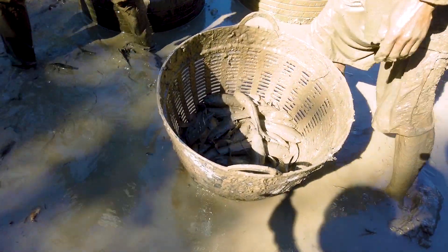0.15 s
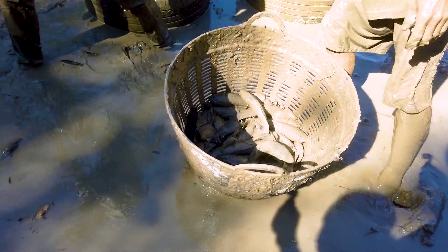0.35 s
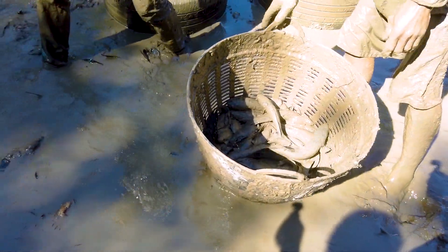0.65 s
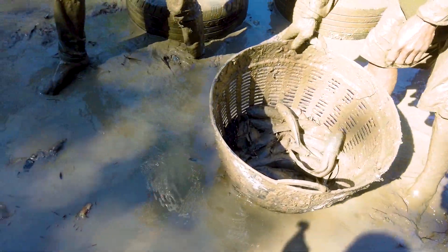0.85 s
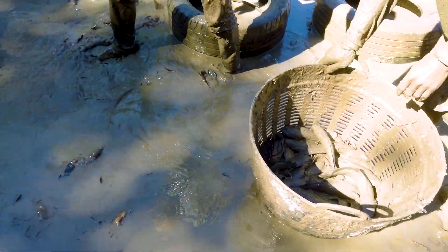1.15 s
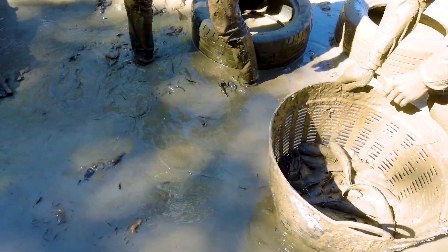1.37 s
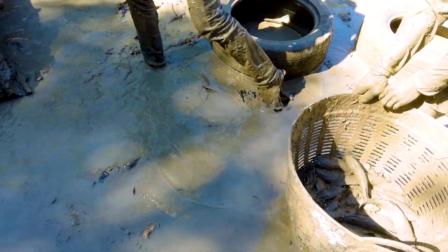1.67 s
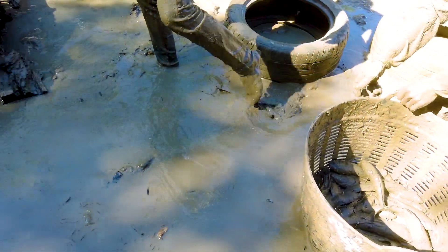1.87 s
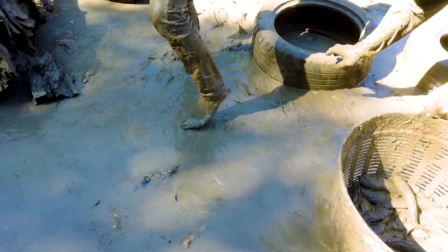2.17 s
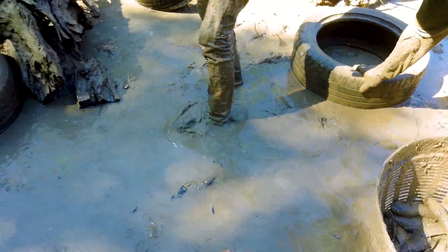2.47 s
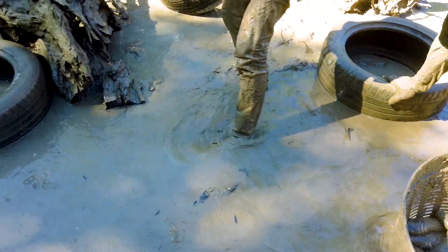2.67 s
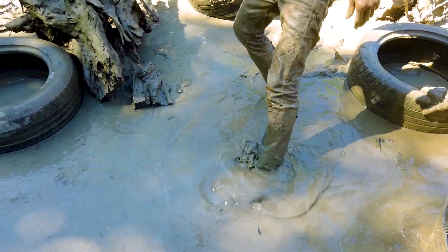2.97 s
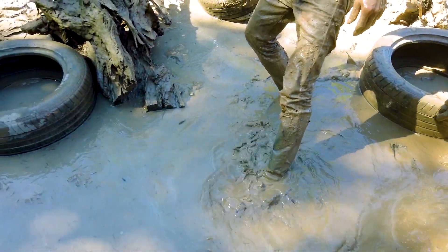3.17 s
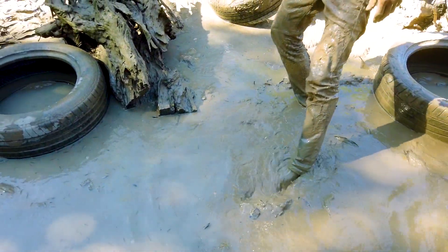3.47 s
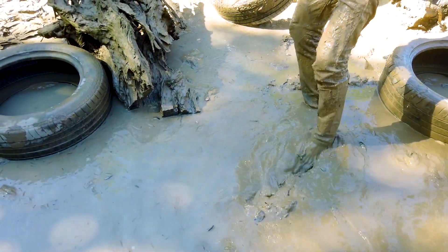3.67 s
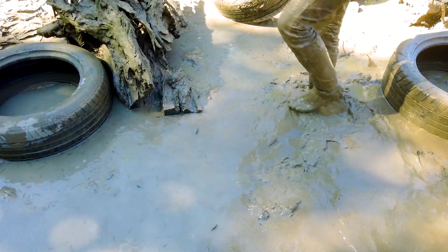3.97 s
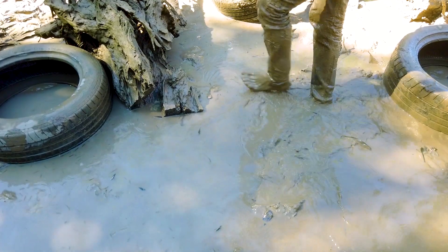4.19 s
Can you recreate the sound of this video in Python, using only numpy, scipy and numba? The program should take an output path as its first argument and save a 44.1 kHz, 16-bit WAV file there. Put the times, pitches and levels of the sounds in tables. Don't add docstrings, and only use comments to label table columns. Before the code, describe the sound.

Bare feet squelch and slosh through shallow muddy water, with popping bubbles, wet smacks and a gusty breeze thumping the microphone.

```python
import sys
import numpy as np
from scipy import signal
from scipy.fft import rfft, irfft, next_fast_len
from scipy.io import wavfile
from scipy.ndimage import uniform_filter1d
from numba import njit

SR = 44100
rng = np.random.default_rng(int(sys.argv[2]) if len(sys.argv) > 2 else 0)


def nominal_scale(level):
    x = np.asarray(level, float) / 20
    return 10 ** x


def file_out(sig):
    cols = np.atleast_2d(sig).T
    lim = np.clip(cols, -1, 1)
    pcm = np.round(lim * 32767).astype(np.int16)
    wavfile.write(sys.argv[1], SR, pcm)


N = 190953


def level(x):
    return x / np.sqrt(np.mean(x ** 2))


def colour(x, points):
    hz, db = np.transpose(points)
    size = next_fast_len(N)
    log_hz = np.log(np.arange(size // 2 + 1) * SR / size + 1)
    gain = nominal_scale(np.interp(log_hz, np.log(hz), db))
    return irfft(rfft(x, size) * gain, size)[..., :N]


def band(x, low_hz, high_hz, order=2):
    limits = [low_hz, min(high_hz, .45 * SR)]
    return signal.sosfilt(signal.butter(order, limits, "bandpass", fs=SR, output="sos"), x)


def walk(rate, channels=1):
    k = int(SR / rate)
    held = np.repeat(rng.standard_normal((channels, N // 200)), k, axis=1)[:, :N]
    return level(uniform_filter1d(uniform_filter1d(held, k), k))


def swells(s, db, half_s, floor_db):
    away = (np.arange(N)[:, None] / SR - s) / np.clip(half_s, .015, .3)
    bells = nominal_scale(db - 6 * np.minimum(away ** 2, 20))
    return 10 * np.log10(nominal_scale(floor_db) ** 2 + np.sum(bells ** 2, axis=1))


def bursts(s, db, ms, rise_ms):
    env = np.zeros(N)
    for at, size, t60 in zip((s * SR).astype(int), nominal_scale(db), ms / 1000):
        t = np.arange(min(int(t60 * SR), N - at)) / SR
        env[at:at + len(t)] += size * 1000. ** (-t / t60) * np.minimum(t * 1000 / rise_ms, 1)
    return env


def hiss(low_hz, high_hz, apart):
    noise = rng.standard_normal((3, N))
    return level(band(noise[0] + apart * noise[1:], low_hz, high_hz))


@njit
def ring(s, hz, t60, glide, size, rise, lag):
    out = np.zeros((2, N))
    for e in range(len(s)):
        n = int(t60[e] * SR)
        fall = np.exp(-np.log(1000.) / n)
        for c in range(2):
            at = s[e] * SR + (1 - c) * lag[e]
            first = int(at) + 1
            step = 2 * np.pi * hz[e] / SR
            phase = step * (first - at)
            strength = size[e]
            for i in range(max(0, min(n, N - first))):
                if first + i >= 0:
                    onset = min(1., (i + 1) / (rise[e] * SR + 1))
                    out[c, first + i] += strength * onset * np.sin(phase)
                phase += min(step * (1 + glide[e] * i / n), 2.8)
                strength *= fall
    return out


def swarm(low_hz, high_hz, cycles, scatter_db, spread, noise, apart, count, glide=1):
    when, pitch, strength, length, bend = rng.random((count, 5)).T
    side = rng.standard_normal(count)
    hz = low_hz * (high_hz / low_hz) ** pitch
    size = nominal_scale(np.minimum(-scatter_db * np.log(strength + 1e-4), 4 * scatter_db))
    t60 = cycles * (1.0 + 2.37 * length) / hz
    grains = ring(when * N / SR, hz, t60, glide * (0.855 * bend - .15), size, 0.041 * t60, spread * side)
    return level(level(grains) + noise * hiss(low_hz, high_hz, apart))


def ragged(x, depth=0.23, hz=350):
    wobble = level(band(rng.standard_normal(N), 130, hz, order=1))
    return x * (1 + depth * wobble) / np.sqrt(1 + depth ** 2)


def air():
    # f/Hz, level/dB per Hz
    air_tone = [(120, -10), (200, 18.5), (2170, -21), (4410, -44), (10800, -36), (15500, -10)]
    near = level(colour(hiss(80, 2700, 0.12), air_tone)) * nominal_scale(-75.5)
    far = level(colour(hiss(2000, 21000, 3.3), air_tone)) * nominal_scale(-75.5 - 35)
    return near + far


def breeze():
    # middle t/s, thump level/dB, half length/s, flutter over the thump/dB
    gusts = [(0.022, -46.5, 0.073, -2), (0.13, -40.5, 0.041, -18), (0.212, -47.5, 0.05, -26),
             (0.409, -36.5, 0.031, -4), (0.518, -53, 0.051, -12), (0.682, -44, 0.05, -21),
             (0.77, -48.5, 0.025, 1.5), (1.013, -35, 0.034, -4.5), (1.113, -32.5, 0.055, -5),
             (1.223, -43, 0.1, -15), (1.375, -44.5, 0.073, -28), (1.526, -34.5, 0.018, -1.5),
             (1.61, -46, 0.048, -20), (1.787, -37.5, 0.019, -16), (1.873, -41.5, 0.038, -25),
             (2.024, -45.5, 0.053, -11), (2.685, -46, 0.035, -29), (2.87, -34.5, 0.03, 0),
             (2.983, -35.5, 0.076, -22), (3.115, -29.5, 0.037, -8), (3.261, -36, 0.058, -19),
             (3.391, -29.5, 0.029, -18), (3.564, -34, 0.17, -18), (3.707, -43.5, 0.094, -9),
             (3.826, -41.5, 0.052, -24), (3.984, -45, 0.045, -31)]
    s, db, half_s, flutter_over = np.transpose(gusts)
    thump_db = swells(s, db, half_s, -57)
    flutter_db = swells(s, db + flutter_over, half_s, -72)
    noise = rng.standard_normal((2, 3, N))
    noise = noise[:, 1:] + 0.65 * noise[:, :1]
    slow = band(band(noise[0], 22, 70, order=1), 12, 84, order=3)
    thump = level(slow) * nominal_scale(thump_db - 1.2 + 1.53 * walk(23.85))
    flutter = level(band(noise[1], 80, 145, order=4)) * nominal_scale(flutter_db - 6 + 3 * walk(25))
    return thump + flutter


def bird():
    # t/s, level/dB, f/Hz, fade/ms
    hoots = [
        (0.85, -40, 425, 38),
        (1.024, -44.5, 416, 28),
        (2.997, -43, 425, 40),
        (3.193, -42.5, 438, 24),
    ]
    out, t = np.zeros(N), np.arange(N) / SR
    for s, db, hz, ms in hoots:
        age = np.clip(t - s, 0, None)
        shape = np.clip(age / 0.0074, 0, 1) * np.exp(-(age * 1000 / ms) ** 2)
        out += nominal_scale(db) * shape * np.sin(2 * np.pi * hz * age)
    return out


def sheets():
    # middle t/s, level/dB, half length/s
    films = [
        (1.103, -58, 0.066),
        (1.66, -59.5, 0.079),
        (4.187, -62.5, 0.017),
    ]
    fizz = swarm(7900, 8970, cycles=220, scatter_db=2, spread=0.92, noise=1.0, apart=0.59, count=2000, glide=0.047)
    return fizz * nominal_scale(swells(*np.transpose(films), -107))


def slosh():
    # middle t/s, slosh level/dB, half length/s, gurgle over slosh/dB, spray over slosh/dB
    pushes = [(.02, -53.5, 0.1, 1.5, 0), (.14, -53, 0.046, -15, 3), (.25, -57, 0.047, -13, -0.5),
              (0.551, -58.5, 0.098, -19, -39), (0.802, -78.5, 0.075, 18.5, 13),
              (1.081, -66.5, 0.058, 2, 14.5), (1.181, -50, 0.068, -2.5, 3), (1.36, -54, 0.18, -10, 2),
              (1.602, -52, 0.044, -28, 0.5), (1.754, -55, 0.082, 6.5, 7), (1.9, -50, 0.13, -34, -2.5),
              (2.052, -54.5, 0.079, -2.5, -2.5), (2.24, -60, 0.096, -5, -5), (2.452, -56.5, 0.093, -9, -11),
              (2.621, -55.5, 0.11, -7, -2.5), (2.871, -52.5, 0.067, -4.5, -0.5),
              (3.104, -51, 0.11, -8.5, -12.5), (3.304, -55.5, 0.12, -12.5, 3),
              (3.564, -55, 0.052, -16, -3.5), (3.842, -54.5, 0.091, -27, -5),
              (3.934, -42.5, 0.074, -39, -7), (4.041, -51.5, 0.077, -5, 0.5), (4.22, -56.5, 0.13, -22, -1)]
    still_db = [
        -69,
        -71,
        -65.5,
    ]
    s, db, half_s, gurgle, spray = np.transpose(pushes)
    slosh_db = swells(s, db, half_s, still_db[0])
    gurgle_db = swells(s, db + gurgle, half_s, still_db[1])
    spray_db = swells(s, db + spray, half_s, still_db[2])
    middle = swarm(837.2, 3500, cycles=20, scatter_db=1.5, spread=0.96, noise=0.5, apart=0.56, count=2600)
    large = swarm(259.4, 950, cycles=19.6, scatter_db=1.0, spread=0.65, noise=0.86, apart=0.026, count=500)
    flicker_db = 3 * walk(55, channels=2)
    patches_db = 1.8 * walk(12, channels=3)
    fine = 0
    for hz, patch_db in zip([3700, 5700, 9300], patches_db):
        drops = swarm(hz, 1.65 * hz, cycles=220, scatter_db=2, spread=1.75, noise=1.1, apart=1.3,
                      count=2600, glide=.04)
        fine = fine + nominal_scale(patch_db) * drops
    middle = ragged(middle) * nominal_scale(slosh_db - 1.5 + flicker_db[0])
    large = large * nominal_scale(gurgle_db + 4.0 + flicker_db[1])
    return middle + large + fine * nominal_scale(spray_db - 1.0)


def spits():
    # t/s, peak level/dB, f/Hz, length/ms
    droplets = [(0.0208, -28, 5100, 3.6), (0.041, -40.5, 5320, 9), (0.1153, -44.5, 5380, 22),
                (0.766, -55.5, 12000, 47), (1.1435, -21, 7100, 5.3), (1.1629, -36, 5220, 35),
                (1.193, -43, 9600, 24), (1.3413, -45.5, 5300, 54), (1.449, -45.5, 5700, 19),
                (1.789, -29.5, 8270, 6.6), (1.8176, -48, 10430, 88), (2.219, -46, 4430, 32),
                (2.4233, -52, 6960, 85), (2.742, -51, 5680, 8.9), (2.54, -46.5, 5740, 12.7),
                (2.605, -35.5, 8700, 11.4), (2.85, -48, 5700, 100), (2.9724, -32, 8100, 9.7),
                (2.976, -29.5, 7080, 7.1), (3.281, -48, 11500, 91), (3.3034, -22.5, 4070, 6.1),
                (3.351, -35.5, 5140, 6.4), (3.544, -53.5, 10700, 24), (3.719, -39, 10060, 7.8),
                (3.784, -48.5, 9600, 40), (3.924, -34.5, 10000, 16), (4.25, -53, 5240, 71)]
    s, db, hz, ms = np.transpose(droplets)
    ms = np.clip(ms, 2, 80)
    out = ring(s, hz, np.minimum(ms, 13) / 1000, 0 * s + 0.12, nominal_scale(db + 16.5), 0 * s + 0.0017, 0 * s)
    # t/s, peak level/dB, f/Hz
    ticks = [(0.124, -36, 11370), (1.143, -31, 5750), (1.1425, -38, 10100), (1.1918, -39, 4500),
             (1.191, -28, 7660), (1.194, -33.5, 10800), (1.341, -31, 8670), (1.351, -28, 5020),
             (1.358, -38, 10740), (1.693, -35.5, 5570), (1.789, -22.5, 6740), (1.7889, -22, 8380),
             (1.8187, -36, 11560), (2.4159, -36, 12170), (2.4233, -28, 4020), (2.4326, -36.5, 7540),
             (2.608, -26, 9570), (2.6082, -31, 10400), (2.868, -35, 6450), (2.9716, -32, 5770),
             (2.9732, -39, 12500), (2.9756, -23.5, 7600), (3.2823, -43, 10500), (3.3062, -38, 10720),
             (3.3062, -28, 12000), (3.307, -32, 11300), (3.3287, -36, 10600), (3.7975, -34, 9800),
             (3.858, -36, 11600), (3.896, -32, 4500), (3.9074, -34, 10600), (3.9266, -31, 11500),
             (3.9274, -38, 12660), (3.927, -33, 8140), (3.9274, -31, 9300), (4.2453, -35.5, 5170)]
    at, tick_db, tick_hz = np.transpose(ticks)
    tick_s = 0 * at + 0.0107
    out = out + ring(at, 1. * tick_hz, tick_s, 0 * at + 0.021, nominal_scale(tick_db + 11.5), 0 * at + 0.0031, 0 * at)
    for low_hz, high_hz in [(3800, 5800), (6200, 10600), (8800, 14900)]:
        spray = swarm(low_hz, high_hz, cycles=10, scatter_db=4, spread=0.5, noise=0.6, apart=0.9, count=5000)
        off_db = -18 * np.abs(np.log2(hz / np.sqrt(low_hz * high_hz)))
        out = out + bursts(s - .005, db + 9.5 + off_db, 3.6 * ms, rise_ms=9.5) * spray
    return out


def splashes():
    # t/s, peak level/dB
    cracks = [(0.0014, -23.5), (0.122, -25.5), (0.202, -40), (0.234, -33), (0.536, -30.5), (0.578, -33),
              (0.8212, -34), (0.881, -35), (1.055, -28), (1.138, -19), (1.1796, -20), (1.195, -45),
              (1.3385, -24.5), (1.462, -25), (1.828, -16.5), (2.19, -29), (2.413, -24.5), (2.582, -29),
              (3.067, -24.5), (3.39, -32.5), (3.723, -33.5), (3.792, -23.5), (3.8405, -27), (3.924, -14),
              (3.967, -30)]
    s, db = np.transpose(cracks)
    froth = swarm(640, 5000, cycles=12, scatter_db=2.5, spread=1.0, noise=1.0, apart=0.37, count=6000)
    return bursts(s, db - 17.0, 0 * s + 79, rise_ms=0.45) * froth


def glugs():
    # t/s, peak level/dB, f/Hz, ring/ms
    big_pockets = [(0.004, -50.5, 315, 47), (0.122, -36.5, 305, 5.5), (0.247, -63.5, 297, 65),
                   (0.396, -51, 188, 210), (0.709, -56, 273, 83), (0.775, -48, 280, 40),
                   (1.067, -42.5, 255, 33), (1.13, -54, 237, 67), (1.239, -50, 333, 67),
                   (1.55, -61.5, 170, 100), (2.099, -47, 605, 5.1), (2.388, -61.5, 245, 62),
                   (2.865, -51.5, 199, 51), (3.145, -50.5, 165, 44), (3.39, -59.5, 193, 71),
                   (3.468, -59.5, 180, 97), (3.588, -68, 232, 130)]
    s, db, hz, ms = np.transpose(big_pockets)
    return ring(s, hz, np.clip(ms, 3, 200) / 1000, 0 * s + 0.29, nominal_scale(db + 22.0), 0.47 / hz, 0 * s)


def smacks():
    # t/s, peak level/dB, f/Hz, length/ms
    rising = [(0.1227, -41, 1987, 17.4), (1.14, -31.5, 930, 10), (1.1433, -29.5, 410, 31),
              (1.32, -43, 1050, 23), (1.4632, -16.5, 466, 2.9), (1.9141, -37.5, 1785, 5.6),
              (3.805, -40.5, 554, 46), (2.187, -50, 2283, 42), (2.3923, -43, 1260, 27),
              (2.418, -40, 1583, 15), (2.4217, -33, 3310, 16), (2.544, -42.5, 2450, 12.5),
              (2.655, -40.5, 1133, 13), (2.851, -29.5, 1090, 16), (2.8862, -40.5, 2040, 1.7),
              (2.97, -38, 1230, 6.5), (0.794, -40.5, 525, 46), (3.166, -31.5, 1170, 12),
              (3.2178, -34.5, 1168, 20), (3.2913, -33, 2630, 1.9), (3.3001, -31.5, 436, 13),
              (3.306, -34, 3270, 14), (4.186, -38, 804, 49), (3.7188, -33, 1547, 9.1),
              (3.935, -30.5, 1147, 12), (3.968, -34.5, 1147, 19), (4.017, -35.5, 1075, 34),
              (4.0692, -32, 401, 33.6), (4.182, -37, 2820, 4.5), (4.1895, -34.5, 1090, 31)]
    sucking = [(0.4482, -42.5, 1170, 9.1), (0.7291, -40.5, 1794, 10), (1.0687, -40, 2280, 10.5),
               (1.151, -32, 1780, 4.7), (1.1909, -29, 2990, 9.1), (1.341, -43, 2220, 5.9),
               (1.3592, -34.5, 2020, 3.3), (1.4511, -31, 1040, 2.2), (1.4637, -32.5, 2620, 0.79),
               (1.6876, -27.5, 1093, 10), (1.7148, -25, 583, 15), (1.7175, -20.5, 1026, 0.86),
               (1.829, -33, 1654, 10), (2.2273, -41, 1240, 13.5), (2.5848, -37, 1135, 9),
               (2.8101, -36, 1005, 8.2), (2.8515, -23, 693, 19.7), (3.0662, -33.5, 1207, 12.6),
               (3.077, -31.5, 990, 13.5), (3.664, -37.5, 715, 30), (3.785, -39, 900, 15),
               (3.839, -31, 890, 10.7), (3.895, -32.5, 920, 25)]
    steady = [(0.0434, -37.5, 1770, 7.3), (0.049, -42.5, 2860, 14), (0.43, -35.5, 1247, 10.4),
              (0.474, -38.5, 1230, 5.8), (1.1808, -29, 2060, 5.5), (1.192, -30.5, 1635, 3.4),
              (1.338, -39.5, 3077, 30), (1.627, -43.5, 2710, 8.9), (1.6477, -26.5, 697, 5.4),
              (1.7108, -46, 1730, 43), (1.817, -43.5, 2090, 8), (1.82, -25.5, 1290, 2.5),
              (1.8225, -25, 810, 5.8), (1.878, -28.5, 1260, 0.99), (2.14, -43, 1680, 4.4),
              (3.456, -42, 1200, 15), (2.43, -40, 2730, 12), (2.6083, -34, 965, 9.3),
              (2.6328, -43.5, 1685, 9.6), (2.866, -43, 1520, 24), (3.0298, -39.5, 3025, 8.9),
              (3.128, -33.5, 2266, 8.4), (3.308, -38.5, 1685, 10), (3.31, -39.5, 2273, 20),
              (3.7935, -42.5, 2370, 6.5), (3.876, -36, 2923, 15), (3.9286, -27, 2140, 6.6),
              (3.9927, -35.5, 1043, 28)]
    # t/s, peak level/dB, f/Hz, length/ms
    blips = [(0.1235, -43.5, 1690, 18), (0.124, -44, 1010, 9.1), (0.4604, -45.5, 1570, 7.4),
             (0.823, -51, 2090, 11.0), (0.8854, -51, 2480, 5.5), (1.057, -45.5, 2720, 8.0),
             (1.0893, -44.5, 2880, 19), (1.164, -39.5, 2600, 5.3), (1.1657, -32, 1550, 6.4),
             (1.1797, -40, 1700, 7.1), (1.1931, -34.5, 2050, 7.0), (1.2199, -36, 1710, 8.0),
             (1.3425, -40, 1230, 5.9), (1.3435, -50, 2940, 4.4), (1.3503, -39, 1560, 3.7),
             (1.36, -39, 2210, 7.0), (1.4653, -40, 1200, 7.0), (1.7418, -38.5, 1720, 5.6),
             (1.8287, -42, 2000, 6.0), (1.8302, -42, 2800, 8), (1.9888, -41, 1490, 8.5),
             (2.0479, -45.5, 2055, 12.0), (2.2899, -44, 2700, 4.3), (2.3062, -48, 1980, 6.2),
             (2.4143, -48, 2114, 17), (2.5091, -40.5, 1050, 7.4), (2.5828, -45, 2820, 12),
             (2.8515, -47, 2960, 8.0), (2.9723, -43, 1750, 5.7), (3.1218, -40.5, 1680, 15),
             (3.3083, -38, 2880, 6), (3.323, -41.5, 2740, 8.8), (3.7982, -42, 1640, 13.0),
             (3.8394, -38.5, 2070, 13), (3.8445, -37.5, 2450, 5.1), (3.8554, -40, 2100, 9.2),
             (3.858, -46, 2875, 36), (3.8975, -39, 1850, 8.7), (3.9279, -39, 2680, 5.7),
             (3.97, -34, 1720, 8.9), (3.9737, -40, 2050, 12), (4.0883, -42.5, 1770, 12),
             (4.2284, -40, 1210, 6.5),
             (0.3356, -52, 763, 24), (0.5489, -56.5, 604, 16), (0.592, -46, 1590, 3.6),
             (0.8005, -51, 530, 19), (0.8866, -47.5, 2140, 3.0), (1.1417, -28, 690, 3.7),
             (1.3275, -43.5, 950, 31), (1.399, -52, 2350, 7.0), (1.574, -44, 1140, 7.3),
             (1.714, -35, 1270, 3.2), (1.829, -37, 2730, 3), (2.009, -41, 1890, 3.3),
             (2.0625, -42, 534, 17.0), (2.39, -43, 840, 5), (2.7144, -49, 1670, 14),
             (3.039, -45, 1378, 8.8), (3.0828, -53, 710, 4.0), (3.1394, -36.5, 870, 23),
             (3.2357, -41, 1000, 21), (3.284, -43.5, 1990, 16), (3.5051, -49, 520, 16),
             (3.521, -42.5, 1540, 2.7), (3.673, -53.5, 2150, 4), (3.808, -39, 845, 6.9),
             (4.092, -50, 2560, 6.4), (4.107, -41, 1210, 3.0), (4.2741, -45.5, 1730, 8.7),
             (4.2946, -46, 865, 3.7)]
    # t/s, peak level/dB, f/Hz
    more_blips = [(0.006, -51, 1700), (0.054, -45, 1210), (0.197, -51, 2560), (1.141, -47, 3030),
                  (1.38, -51, 2260), (1.442, -45, 1620), (1.665, -36, 724), (1.756, -54, 2340),
                  (1.772, -41, 1360), (1.975, -53, 2500), (2.112, -43.5, 690), (2.608, -47, 1607),
                  (2.63, -48, 2770), (3.232, -54, 2170), (3.348, -48, 2583), (3.6, -48, 2260),
                  (3.862, -38, 1220), (3.867, -38.5, 1710), (3.902, -43, 2340), (3.904, -40, 1390),
                  (4.049, -52, 2900), (4.255, -40, 1180)]
    swoops = [
        (0.573, -52, 870, 21),
        (3.15, -38, 532, 45),
        (3.431, -53, 1004, 30),
        (3.55, -47, 785, 20),
    ]
    more_ms = 10.5
    small = blips + [extra + (more_ms,) for extra in more_blips]
    s, db, hz, ms = np.transpose(rising + sucking + steady + small + swoops)
    glide = np.repeat([0.49, -0.396, 0.016, 0.15, 1.9],
                      [len(rising), len(sucking), len(steady), len(small), len(swoops)])
    t60 = (9 + 2.08 * np.clip(ms, 1, 150)) / 1000
    return ragged(ring(s - .0012, hz, t60, glide, nominal_scale(db + 6.0), 0.12 * t60, 0 * s))


def banks(x, t60=0.17, db=-12):
    t = np.arange(8000) / SR
    tail = rng.standard_normal((2, 8000)) * 1000. ** (-t / t60) * (t > .002)
    tail = tail / np.sqrt(np.sum(tail[0] ** 2))
    return x + nominal_scale(db) * signal.fftconvolve(x, tail, axes=1)[:, :N]


def ports(x):
    # f/Hz, phase/rad
    lead = [(0, 0), (300, -.42), (2500, -.5), (2900, -1), (3300, -3.3), (4100, -3.6), (6100, -6.1),
            (8500, -6.6), (10000, -8), (11500, -7.1), (16000, -7.4)]
    size = next_fast_len(N)
    left, right = rfft(x, size)
    turn = np.interp(np.arange(len(left)) * SR / size, *np.transpose(lead))
    return irfft(np.array([left * np.exp(1j * turn), right]), size)[:, :N]


def scene():
    # f/Hz, level/dB
    phone_tone = [(200, -9), (600, -6.5), (1500, 1), (2800, 6.5), (3500, 3.5), (4500, -9), (5600, -8.5),
                  (6400, -12.5), (7300, -11.5), (8400, -9), (9500, -11), (10700, -4.5), (13000, -13),
                  (15500, -11)]
    pops = glugs() + smacks() + splashes()
    water = colour(banks(pops + spits()) + slosh() + bird(), phone_tone)
    return ports(water + air() + sheets()) + breeze()


def band_limit(x):
    return signal.sosfilt(signal.butter(12, 15800, fs=SR, output="sos"), x)


def record(dry):
    mix = signal.sosfilt(signal.ellip(12, .2, 90, 15750, fs=SR, output="sos"), dry)
    return band_limit(mix)


dry = scene()
out = record(dry)
file_out(out)
```